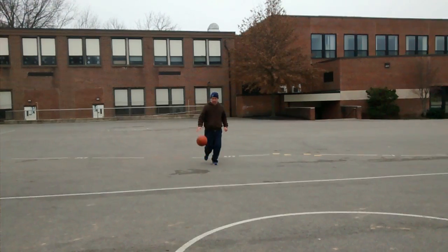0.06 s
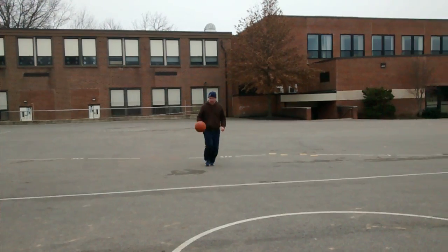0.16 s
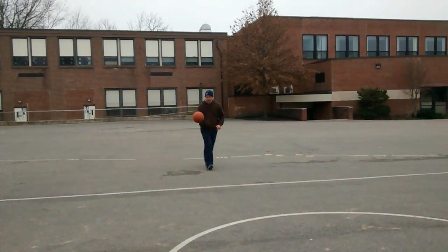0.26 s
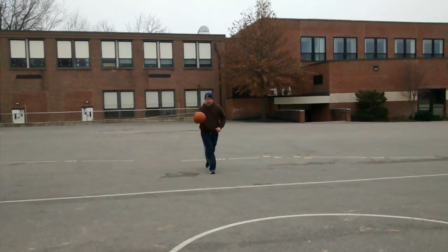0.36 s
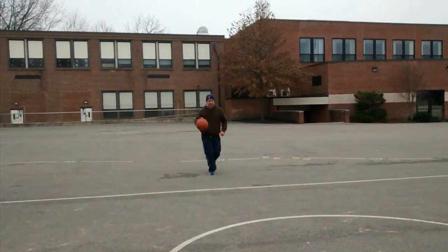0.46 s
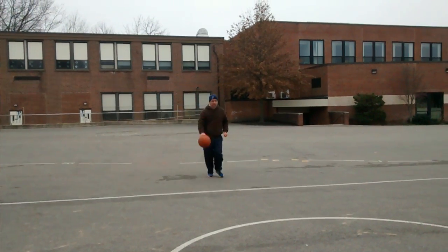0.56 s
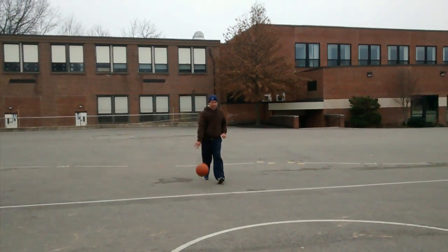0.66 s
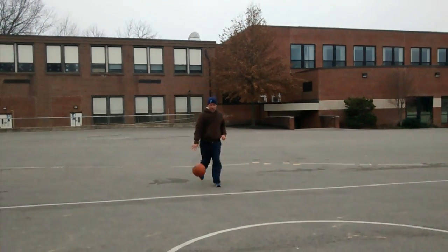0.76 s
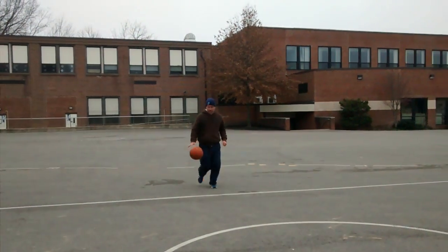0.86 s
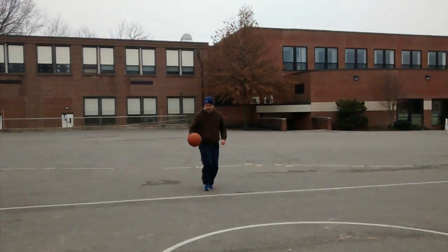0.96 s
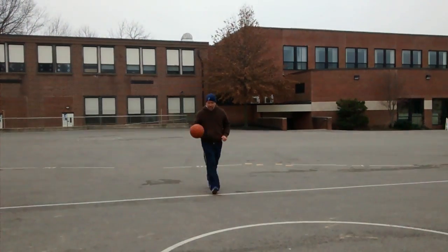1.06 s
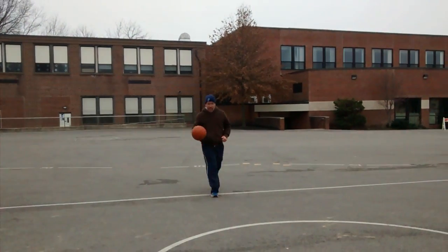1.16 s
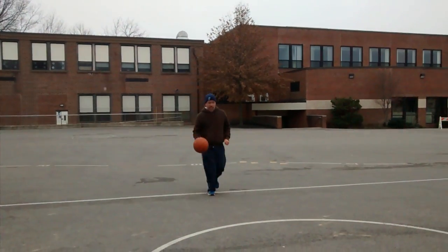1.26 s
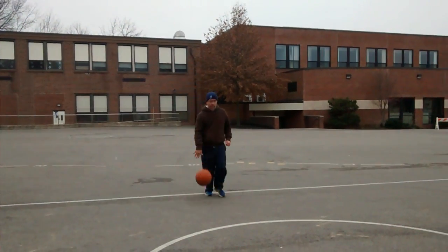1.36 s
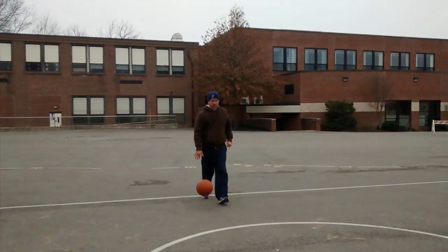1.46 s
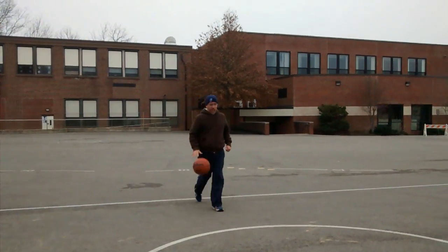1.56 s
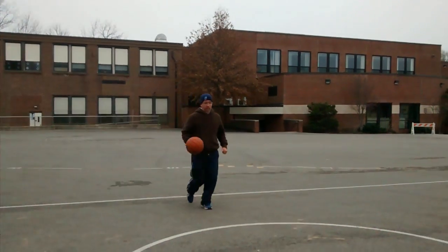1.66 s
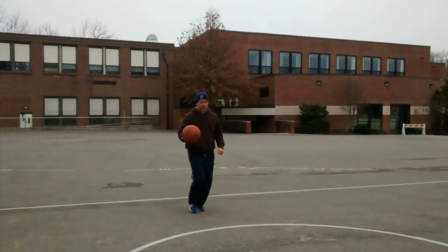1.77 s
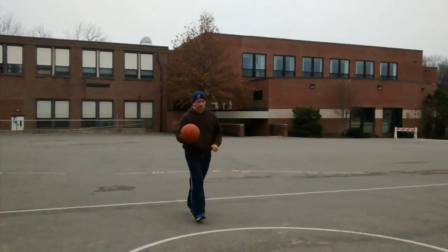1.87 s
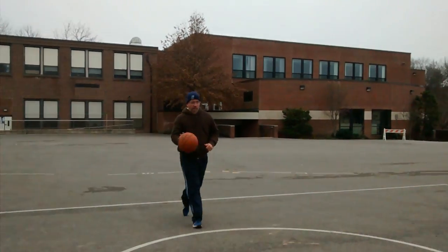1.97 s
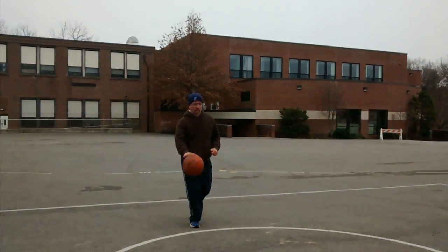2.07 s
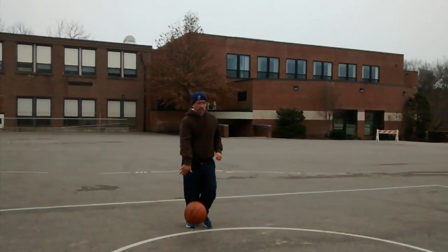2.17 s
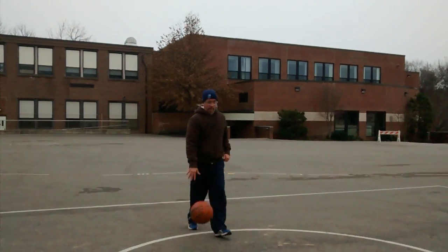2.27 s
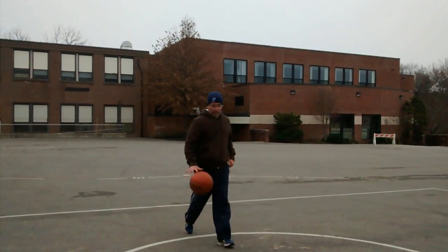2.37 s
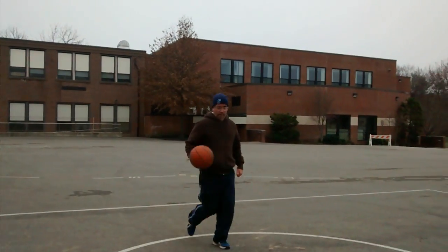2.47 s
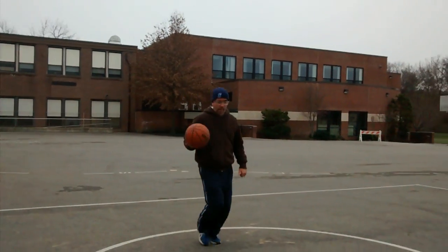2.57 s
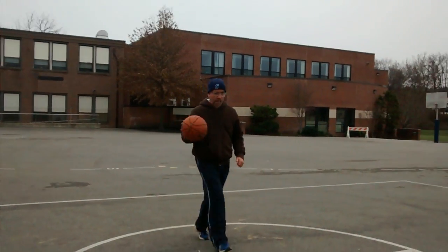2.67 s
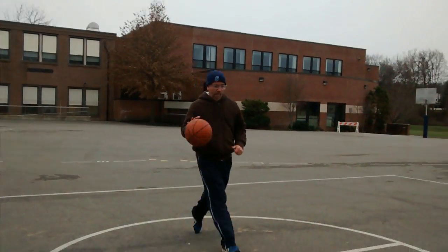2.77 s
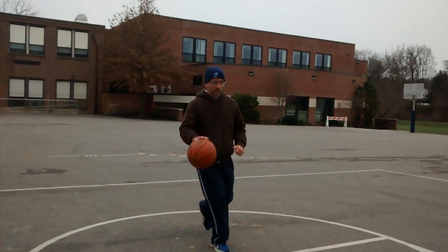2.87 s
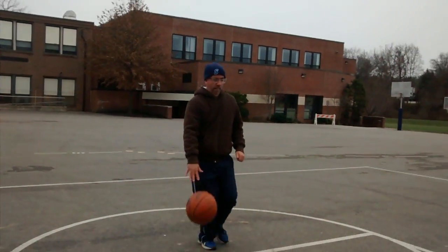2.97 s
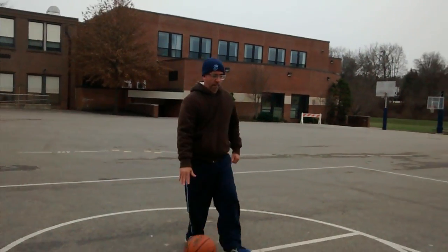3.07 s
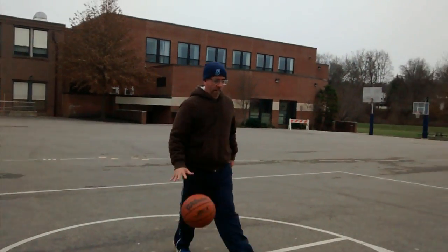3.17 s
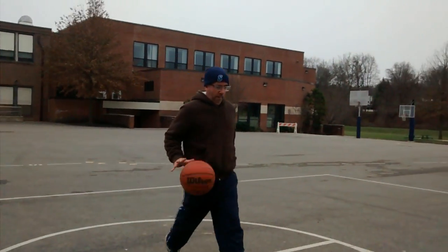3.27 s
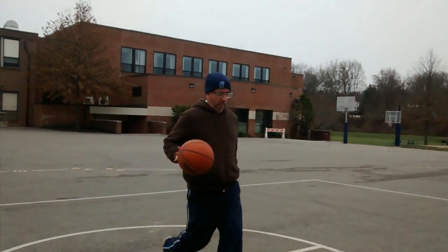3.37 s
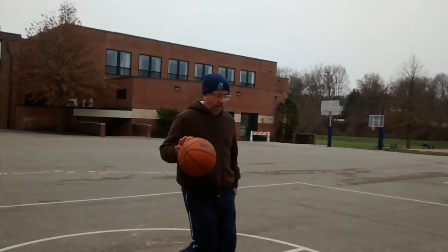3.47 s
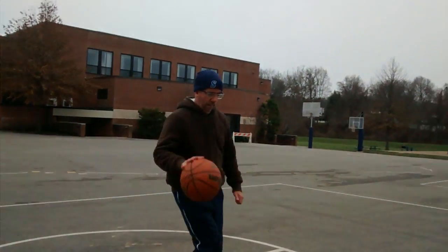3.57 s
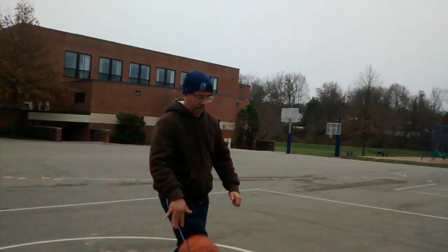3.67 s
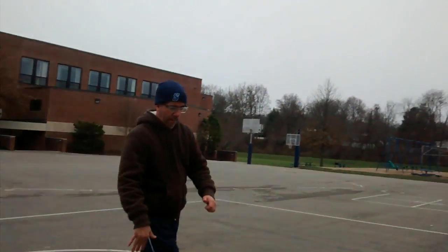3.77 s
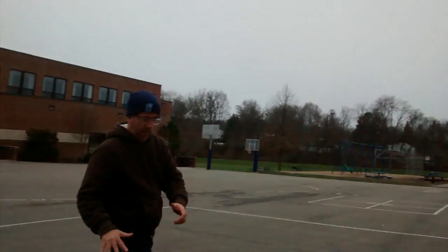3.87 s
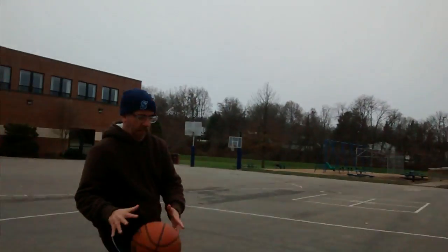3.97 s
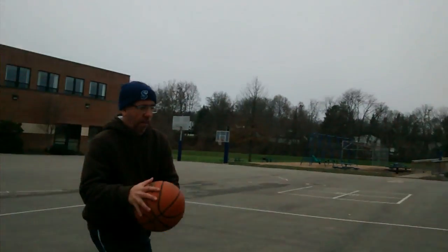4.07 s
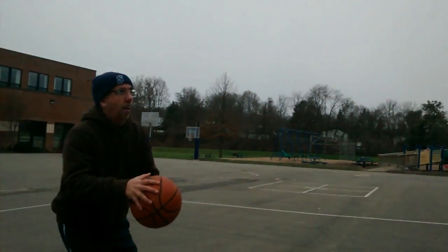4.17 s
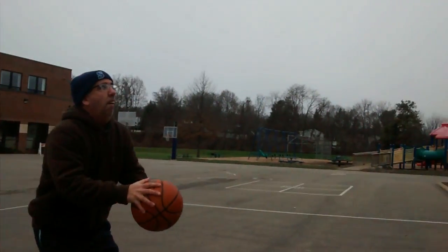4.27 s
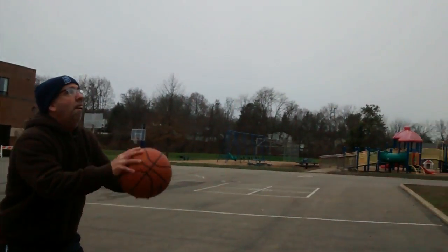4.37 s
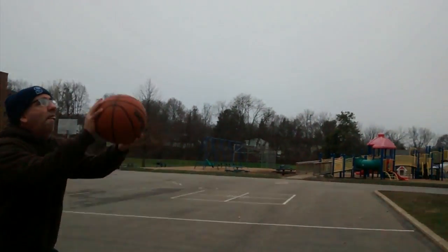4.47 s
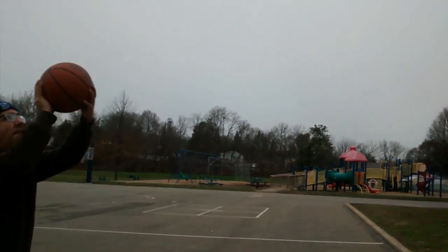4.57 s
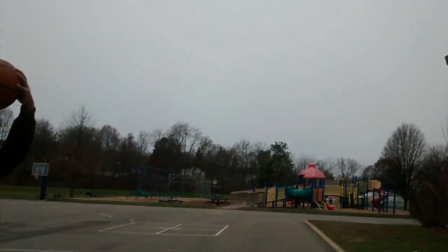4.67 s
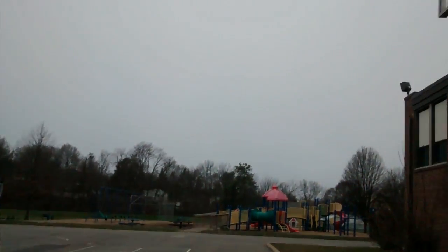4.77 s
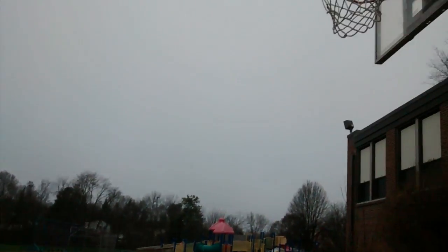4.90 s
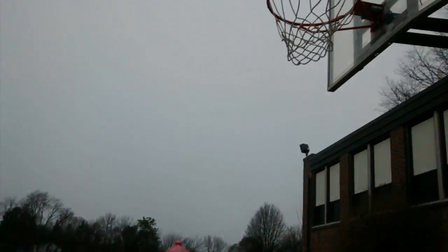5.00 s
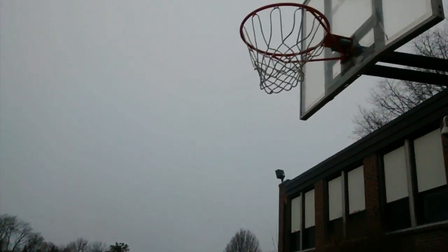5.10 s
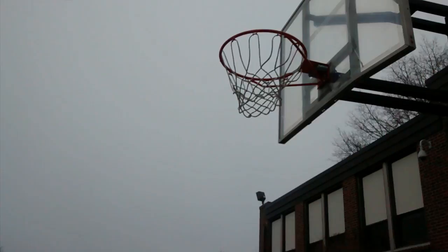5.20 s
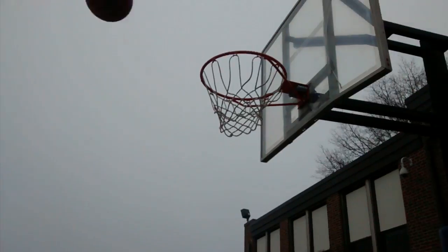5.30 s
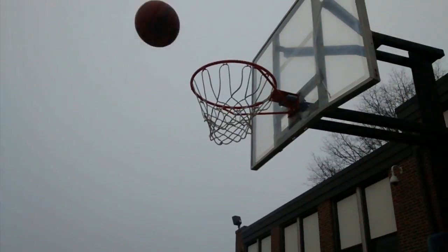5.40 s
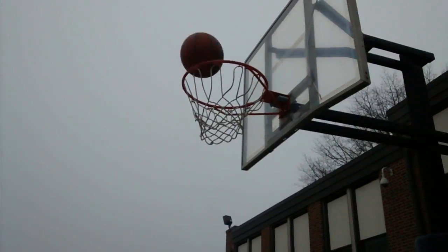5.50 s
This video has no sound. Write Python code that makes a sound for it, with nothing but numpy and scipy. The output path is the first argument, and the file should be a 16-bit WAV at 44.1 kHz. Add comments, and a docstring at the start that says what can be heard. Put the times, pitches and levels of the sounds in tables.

```python
"""A basketball is dribbled across an asphalt schoolyard towards a hand-held phone.
The sound fades in on the ring and echoes of the first bounce; five more follow, to 3.9 s. Each is a thump and slap
of filtered impulse, grit crunch and ringing air modes; a near wall and a receding school front throw it back.
Scuffs and dull pats (shaped noise) run throughout, small clicks near 2 s; traffic thins from 1 s, wind gusts near 5 s.
Distant traffic, wind and hiss are coloured noise; the gain drops on loud sounds and creeps back."""
import sys
import numpy as np
from scipy import signal
from scipy.fft import rfft, irfft
from scipy.io import wavfile
from scipy.ndimage import uniform_filter1d

SR = 44100
rng = np.random.default_rng(int(sys.argv[2]) if len(sys.argv) > 2 else 0)


def digitize_waveform(pressure):
    """Quantize a signal to 16-bit integers and store it at the path in sys.argv[1].

    Rows of a 2-D input are taken as channels; values are limited to [-1, 1].
    """
    field = np.atleast_2d(pressure).T
    bounded = np.clip(field, -1, 1)
    quanta = np.round(bounded * 32767).astype(np.int16)
    wavfile.write(sys.argv[1], SR, quanta)


N = 244422
T = np.arange(N) / SR

# bounces: start_s, level_db, contact_hardness_hz, shell_knock_hz, knock_db, favoured_air_mode_hz
BOUNCES = [(0.0787, 4.5, 2940, 3000, -12, 3270), (0.8278, 4, 4270, 3350, -14, 3305),
           (1.5360, 5, 3840, 684, -16, 1620), (2.3197, 6.5, 6800, 920, -5.5, 3400),
           (3.1537, 4, 4600, 1000, -13, 3350), (3.8795, 5.5, 18000, 3580, 5, 2708)]
# ball on ground, squeezed-air thump near 260 Hz and rubber slap near 1.6 kHz: freq_hz, level_db
SHELL_SPECTRUM = [(30, -18.5), (112, 25), (190, 27.5), (238, 31.5), (298, 33.5), (385, 14), (455, 22),
                  (530, 16.5), (660, 19.5), (1080, 19), (1680, 24), (2600, 16), (5400, 7), (16000, -9)]
# standing waves of the air inside the ball: freq_hz, level_db, t60_s
AIR_MODES = [(948, -8, 0.43), (1540, -7.5, 0.26), (2070, -4, 0.29), (2580, -7.5, 0.26), (2665, -18, 0.5),
             (3130, -4.5, .25), (3329, -19, 1), (3520, -12, 0.39), (3570, -4, 0.21), (3640, -15, 0.3),
             (3980, -16.5, 0.65), (4100, -8, 0.16), (4124, -15, 0.29), (4527, -18, 0.48), (5174, -26, 0.12)]
# echoes off ground, body and near wall: delay_s, level_db, lowpass_hz
NEAR_ECHOES = [(.0088, -18, 1520), (.0165, -29.5, 480), (0.0465, -16.5, 422), (.0550, -26.5, 395)]
# soles on gritty asphalt: start_s, level_db, slide_s, tilt_db_per_octave
STEPS = [(0.402, -39.5, 0.056, 1.5), (0.799, -35.5, 0.0086, -0.5), (0.809, -22, 0.0069, 0.5),
         (1.190, -40, 0.095, 2), (1.633, -46, 0.0097, 5), (2.034, -47, .075, 5.5),
         (2.440, -46.5, 0.0071, 0), (2.846, -42.5, 0.053, 3.5), (3.024, -53.5, 0.024, 6),
         (3.775, -45, 0.042, -2.5), (4.266, -47, 0.03, -1), (4.413, -50.5, 0.062, 2.5),
         (5.315, -55, 0.065, 7.5)]
# short dull pats: palms on the ball, light footfalls, and strong school-front echoes of bounces
# at 0.256 and 4.142 s: start_s, level_db, decay_s, tilt_db_per_octave
PATS = [(0.256, -34.5, 0.0069, -2), (1.178, -31, 0.0052, 7.5), (1.297, -41, 0.0084, 2),
        (3.347, -39, 0.0045, -2.5), (3.402, -32.5, 0.0071, 0.5), (3.7992, -33.5, 0.0038, 2.5),
        (3.836, -39.5, 0.0049, 5.5), (4.142, -37.5, 0.02, -2.5), (4.2484, -31, 0.0067, 2),
        (4.379, -37, 0.0095, 0.5), (5.213, -40.5, 0.0032, 1), (5.324, -39, 0.0055, 10.5)]
# dry ticks and rustles by the microphone: start_s, level_db, decay_s, left_minus_right_db
TICKS = [(1.655, -25, 0.00063, -9.5), (1.7097, -25, 0.0013, 12), (1.714, -44.5, 0.024, 8),
         (2.055, -44, 0.016, -5), (2.102, -29, 0.00083, -6.5), (2.1456, -32.5, 0.0012, -2)]
# spectrum of gritty asphalt: freq_hz, level_db
GRIT_SPECTRUM = [(20, -79), (150, -28), (500, -5), (950, 2), (1650, 5.5), (2400, -1), (3400, 3.5),
                 (4400, -3.5), (6000, -16.5), (11000, -30), (16000, -43.5)]
# spectrum of a pat: freq_hz, level_db
PAT_SPECTRUM = [(20, -60), (120, 2), (300, 7), (600, -1.5), (1100, 6), (1800, -6), (2600, -10.5),
                (4000, -10), (7000, -40.5), (16000, -58)]
# spectrum of a tick: freq_hz, level_db
TICK_SPECTRUM = [(500, -37), (2500, -16), (4500, 1.5), (8000, -3), (12000, -1), (16000, -3)]
# spectrum of distant traffic: freq_hz, level_db
TRAFFIC_SPECTRUM = [(20, -27.5), (60, -3.5), (130, 1.5), (260, 1), (400, -1), (560, -5), (780, -6),
                    (1050, -12), (1700, -15.5), (2500, -24.5), (3600, -24.5), (5500, -35), (9000, -47.5),
                    (16000, -35)]
# spectrum of the even hiss: freq_hz, level_db
HISS_SPECTRUM = [(100, 6), (1000, -7.5), (2400, 10), (3500, 11), (5200, 4.5), (9000, 3.5), (15000, 2.5),
                 (16000, -40)]
# spectrum of wind on the ports: freq_hz, level_db
WIND_SPECTRUM = [(20, -7.5), (45, 2.5), (95, 3.5), (160, -15), (300, -37), (1000, -23), (16000, -83)]
# distant traffic sinks and returns: time_s, level_db
TRAFFIC_LEVEL = [(0, -43.5), (.75, -42), (1.1, -44), (3.75, -48), (4.05, -50), (4.75, -52), (5.4, -46)]
# wind on the ports, a long lull and then a gust: time_s, level_db
WIND_LEVEL = [(0, -50), (0.699, -52), (3.75, -56.5), (4.3, -61), (5.05, -45.5), (5.54, -51.5)]

# a harder contact pings the air louder and brighter, per octave above USUAL_CONTACT_HZ
USUAL_CONTACT_HZ = 5000
PING_DB, PING_DB_PER_OCTAVE, PING_TILT_DB_PER_OCTAVE = -46.5, 2.5, 2.6
# faint bright scatter of the open yard
HAZE_DB, HAZE_DECAY_S, HAZE_TILT_DB_PER_OCTAVE = -57, 0.054, 2.5
# school front: delay and level at time 0; walking away makes it later and weaker
FAR_ECHO_S, FAR_ECHO_DB, FAR_FADE_DB_PER_S = 0.179, -20.5, 3
WALK_M_PER_S, SOUND_M_PER_S = 2.15, 343
# a step bites (heel), eases as the sole slides, lets go
STEP_ATTACK_S, HEEL_DB, HEEL_DECAY_S = 0.004, 5.5, 0.0082
STEP_EASE_DB_PER_S, STEP_RELEASE_S = 71, 0.01
START_S, FADE_IN_S, TOP_HZ = 0.1274, 0.0045, 15600
GAIN_RECOVERY_DB_PER_S = 3.8


def ball(knock_width=0.42, crunch_db=-24, crunch_decay_s=0.0064, crunch_tilt_db_per_octave=-3.0,
         uneven_db=2, favour_db=10, favour_width_hz=60, far_side_db=-13):
    """The shell flattens with a spike and thumps; grit crunches, the inner air pings, walls answer."""
    out = np.zeros((2, N))
    t = T[:int(.7 * SR)]
    mode_hz, mode_db, t60_s = np.transpose(AIR_MODES)
    for start_s, level_db, contact_hz, knock_hz, knock_db, favoured_hz in BOUNCES:
        # each landing spot knocks at its own pitch and shares the blow differently among the air modes
        thump = -undb(level_db) * lowpass(impulse(SHELL_SPECTRUM), contact_hz)
        thump = thump + undb(knock_db) * resonance(thump, knock_hz, knock_width * knock_hz)
        favour = np.exp(-((mode_hz - favoured_hz) / favour_width_hz) ** 2)
        share_db = favour_db * favour + uneven_db * rng.standard_normal(len(AIR_MODES))

        hardness_octaves = np.log2(contact_hz / USUAL_CONTACT_HZ)
        modes = zip(mode_hz, mode_db + share_db, t60_s)
        ping = undb(PING_DB) * ring(modes, t, PING_TILT_DB_PER_OCTAVE * hardness_octaves)
        haze = colour(rng.standard_normal((2, len(t))), GRIT_SPECTRUM, HAZE_TILT_DB_PER_OCTAVE)
        haze = undb(HAZE_DB) * haze * np.exp(-t / HAZE_DECAY_S)
        crunch = [colour(grit(t), GRIT_SPECTRUM, crunch_tilt_db_per_octave) for port in range(2)]
        crunch = undb(crunch_db) * np.array(crunch) * np.exp(-t / crunch_decay_s)
        tail = undb(PING_DB_PER_OCTAVE * hardness_octaves) * (ping + haze)
        add(out, start_s, thump)
        add(out, start_s, undb(level_db) * (tail + crunch))

        for delay_s, echo_db, dull_hz in NEAR_ECHOES:
            add(out, start_s + delay_s, undb(echo_db) * lowpass(thump, dull_hz))
        far_s = FAR_ECHO_S + 2 * WALK_M_PER_S * start_s / SOUND_M_PER_S
        far_side = np.array([[1], [-1]]) * facade(thump)
        far = facade(thump) + undb(far_side_db) * far_side
        add(out, start_s + far_s, undb(FAR_ECHO_DB - FAR_FADE_DB_PER_S * start_s) * far)
    return out


def facade(thump, swell_s=0.037, decay_s=0.17, first_db=-2, dull_hz=380, bright_db=-22):
    """The stepped school front: one first echo, then a swarm from bays and windows, mostly bass."""
    t = T[:int(.7 * SR)]
    swarm = rng.standard_normal(len(t)) * (rng.random(len(t)) < 300 / SR)  # about 300 echoes per s
    swarm *= np.minimum(t / swell_s, 1) * np.exp(-np.maximum(t - swell_s, 0) / decay_s)
    swarm *= 3 / np.sqrt(np.sum(swarm ** 2))
    swarm[0] += undb(first_db)
    bass = signal.sosfilt(signal.butter(2, [150, dull_hz], "band", fs=SR, output="sos"), thump)
    return signal.fftconvolve(swarm, bass + undb(bright_db) * thump)


def shoes(patchy_db=3, spurt_db=1.5, wall_s=0.073, wall_db=-25):
    """Grit cracks under a sole in uneven spurts: the heel bites, the slide eases, the foot lets go."""
    out = np.zeros(N)
    t = T[:SR // 4]
    pressure_db = HEEL_DB * np.exp(-t / HEEL_DECAY_S) - STEP_EASE_DB_PER_S * t
    pressure = np.minimum(t / STEP_ATTACK_S, 1) * undb(pressure_db)
    for start_s, level_db, slide_s, tilt_db_per_octave in STEPS:
        release = np.exp(-np.maximum(t - slide_s, 0) / STEP_RELEASE_S)
        scuff = colour(grit(t), GRIT_SPECTRUM, tilt_db_per_octave)
        add(out, start_s, undb(level_db) * pressure * release * scuff)
    out *= undb(patchy_db * walk(400) + spurt_db * walk(90))
    add(out, wall_s, undb(wall_db) * out)
    return out


def pats(ping_db=-24):
    """Short dull pats of palms, footfalls and two far bounce echoes: decaying noise and faint air modes."""
    out = np.zeros(N)
    t = T[:SR // 4]
    for start_s, level_db, decay_s, tilt_db_per_octave in PATS:
        pat = colour(rng.standard_normal(len(t)), PAT_SPECTRUM, tilt_db_per_octave)
        pat = pat * np.exp(-t / decay_s)
        ping = ring(AIR_MODES, t) / np.sqrt(len(AIR_MODES))
        add(out, start_s, undb(level_db) * (pat + undb(ping_db) * ping))
    return out


def ticks():
    """Bright decaying noise clicks, each nearer to one port."""
    out = np.zeros((2, N))
    t = T[:SR // 10]
    for start_s, level_db, decay_s, pan_db in TICKS:
        click = colour(rng.standard_normal((2, len(t))), TICK_SPECTRUM) * np.exp(-t / decay_s)
        port_db = level_db + np.array([[pan_db], [-pan_db]]) / 2
        add(out, start_s, click * undb(port_db))
    return out


def outdoors(side_db=-7, waver_db=1.4, gust_db=1, hiss_db=-58.5):
    """Distant traffic, wind buffeting each port on its own, and an even hiss."""
    traffic_db = np.interp(T, *np.transpose(TRAFFIC_LEVEL))
    wind_db = np.interp(T, *np.transpose(WIND_LEVEL))
    mid, side = colour(rng.standard_normal((2, N)), TRAFFIC_SPECTRUM)
    traffic = mid + undb(side_db) * np.array([side, -side])
    traffic = traffic * undb(traffic_db + waver_db * walk(13))
    wind = colour(rng.standard_normal((2, N)), WIND_SPECTRUM) * undb(wind_db + gust_db * walk(11))
    hiss = undb(hiss_db) * colour(rng.standard_normal((2, N)), HISS_SPECTRUM)
    return traffic + wind + hiss


def impulse(points):
    """Minimum-phase response with a spectrum of (Hz, dB) points, by folding the cepstrum."""
    hz, db = np.transpose(points)
    bin_hz = np.fft.rfftfreq(8192, 1 / SR)
    gain = undb(np.interp(np.log(bin_hz + 1), np.log(hz), db))
    cepstrum = irfft(np.log(gain))
    half = len(cepstrum) // 2
    cepstrum[1:half] *= 2
    cepstrum[half + 1:] = 0
    return irfft(np.exp(rfft(cepstrum)))[:half]


def ring(modes, t, tilt_db_per_octave=0):
    """Decaying modes struck at t = 0; the tilt turns about 2 kHz."""
    total = 0
    for hz, db, t60_s in modes:
        gain = undb(db + tilt_db_per_octave * np.log2(hz / 2000))
        total = total + gain * np.exp(-np.log(1000) * t / t60_s) * np.cos(2 * np.pi * hz * t)
    return total


def grit(t, grain_db=5.5):
    """White crackle: dense grains of uneven size."""
    grain_size = np.minimum(rng.exponential(size=len(t)), 5)
    return rng.standard_normal(len(t)) * undb(grain_db * grain_size)


def colour(x, points, tilt_db_per_octave=0):
    """Give white x a spectrum of (Hz, dB) points, tilted per octave; unit rms."""
    hz, db = np.transpose(points)
    octave = np.log2(np.fft.rfftfreq(x.shape[-1], 1 / SR) + 1)
    gain_db = np.interp(octave, np.log2(hz), db) + tilt_db_per_octave * octave
    y = irfft(rfft(x) * undb(gain_db), x.shape[-1])
    return y / y.std()


def walk(rate_hz):
    """Random levels held 1 / rate_hz s and slewed twice; spread near 1."""
    hold = int(SR / rate_hz)
    steps = np.repeat(rng.standard_normal(N // hold + 1), hold)
    return np.sqrt(2) * uniform_filter1d(uniform_filter1d(steps, hold), hold)[:N]


def resonance(x, hz, width_hz):
    """Band-pass with gain 1 at the centre."""
    return signal.lfilter(*signal.iirpeak(hz, hz / width_hz, fs=SR), x)


def lowpass(x, hz, order=2):
    """Butterworth low-pass."""
    return signal.sosfilt(signal.butter(order, min(hz, .45 * SR), fs=SR, output="sos"), x)


def undb(db):
    """Decibels to gain."""
    return 10 ** (np.asarray(db) / 20)


def add(out, start_s, x):
    """Mix x into out from start_s on."""
    i = max(int(round(start_s * SR)), 0)
    n = min(x.shape[-1], out.shape[-1] - i)
    out[..., i:i + n] += x[..., :n]


def scene(contact_pan_db=-3):
    """The ball stays in front; shoes and pats reach the right port a little more strongly."""
    contacts = (shoes() + pats()) * undb(np.array([[1], [-1]]) * contact_pan_db / 2)
    return ball() + contacts + ticks() + outdoors()


def ports(x, low_turn=1.15, high_turn=2.12, shade=0.35, lift_db=-1.0, body_db=-13):
    """Each port has its own duct: the left shades and phase-turns narrow bands, the right lifts two."""
    left = x[0] - low_turn * resonance(x[0], hz=2453, width_hz=396)
    left = left - shade * resonance(left, hz=3930, width_hz=710)
    left = left - high_turn * resonance(left, hz=4750, width_hz=820)
    left = left - high_turn * resonance(left, hz=10100, width_hz=820)
    lift = undb(lift_db) * resonance(x[1], hz=3690, width_hz=1200)
    body = undb(body_db) * resonance(x[1], hz=1594, width_hz=640)
    return np.array([left, x[1] + lift + body])


def gain_control(x, threshold_db=-10.5):
    """The gain drops at once on a loud sound and recovers by a few dB a second."""
    power = uniform_filter1d(np.mean(x ** 2, axis=0), size=256)
    level_db = 10 * np.log10(np.maximum(power, 1e-12))
    recovery_db = GAIN_RECOVERY_DB_PER_S * T
    held_db = np.maximum.accumulate(level_db + recovery_db) - recovery_db
    return x * undb(-np.maximum(held_db - threshold_db, 0))


def record(dry):
    """Ports, gain control, clipping of peaks, a quick fade-in at START_S and a steep low-pass."""
    fade_in = np.clip((T - START_S) / FADE_IN_S, 0, 1)
    clipped = np.clip(gain_control(ports(dry)), -.97, .97) * fade_in
    return signal.sosfilt(signal.ellip(8, .2, 70, TOP_HZ, fs=SR, output="sos"), clipped)


dry = scene()
out = record(dry)
digitize_waveform(out)
```